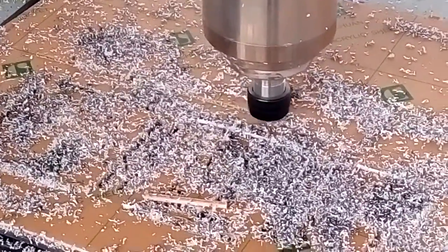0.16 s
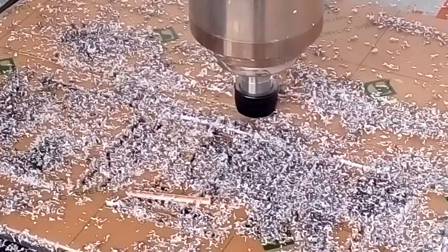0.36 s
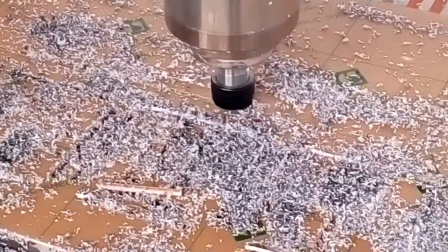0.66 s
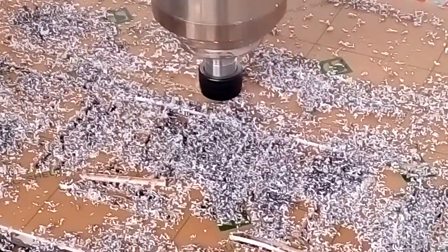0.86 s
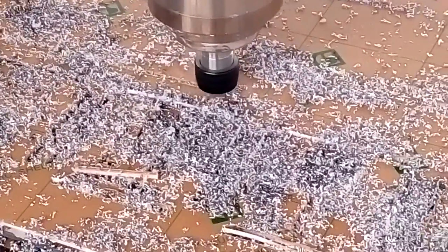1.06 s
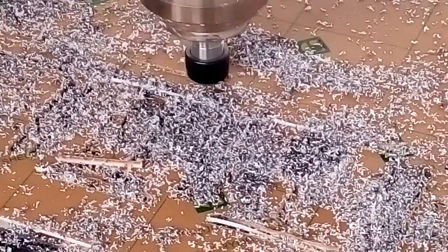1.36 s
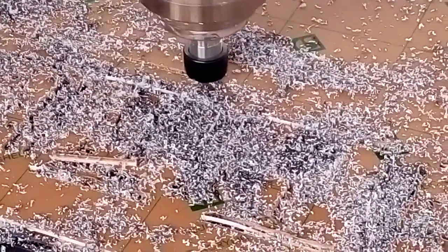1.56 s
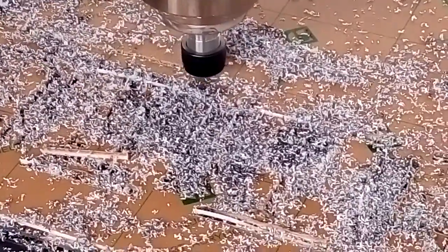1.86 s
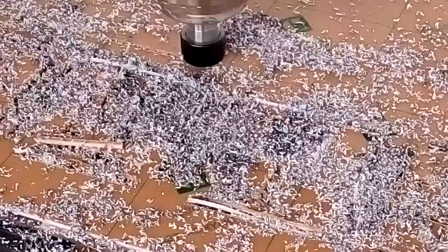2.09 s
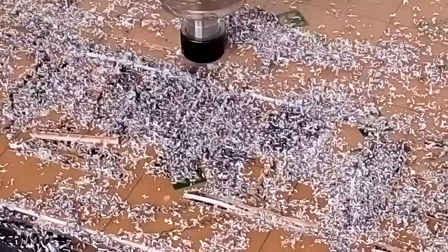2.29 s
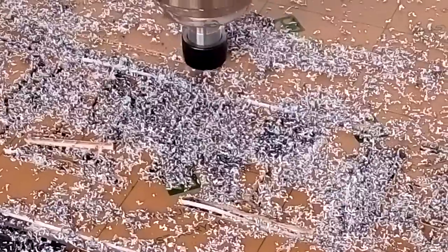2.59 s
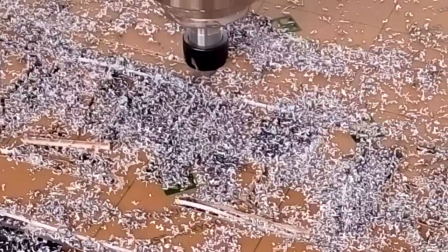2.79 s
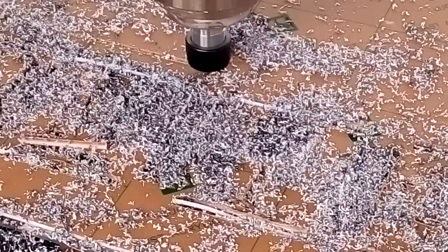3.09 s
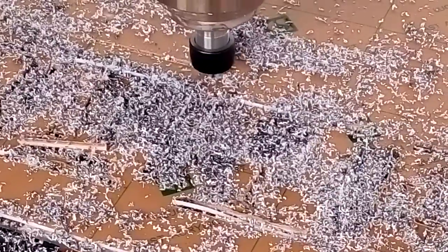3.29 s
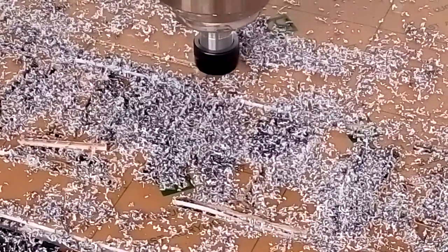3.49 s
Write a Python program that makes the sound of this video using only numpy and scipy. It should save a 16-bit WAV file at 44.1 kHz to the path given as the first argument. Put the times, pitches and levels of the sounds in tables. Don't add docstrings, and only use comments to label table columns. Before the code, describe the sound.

Continuous milling spindle whine, left-heavy and pure with buzzing overtones, over low shop rumble and thin hiss; a short bright air puff passes around two-thirds through, then the same whine continues to the end.

```python
import sys
import numpy as np
from scipy import signal
from scipy.fft import rfft, irfft, next_fast_len
from scipy.io import wavfile
from scipy.ndimage import uniform_filter1d

SR = 44100
rng = np.random.default_rng(int(sys.argv[2]) if len(sys.argv) > 2 else 0)


def inscribe(sig):
    pcm = np.round(np.clip(np.atleast_2d(sig).T, -1, 1) * 32767)
    wavfile.write(sys.argv[1], SR, pcm.astype(np.int16))


def voltage_ratio(decibels):
    exponent = np.asarray(decibels, float) / 20
    return 10 ** exponent


N = 160965
STEP = 32

# pitch_hz, left_db_per_hz, right_db_per_hz, likeness_0_to_1 [between the ears]
HISS_COLOUR = [(30, -79.5, -91.5, .6), (65, -87.5, -88, 0.8), (141, -64.5, -69.5, 1),
               (450, -78.5, -82, 0.99), (754, -63, -80, 0.2), (2390, -72.5, -64.5, 0),
               (2980, -76.5, -78.5, 0.7), (5900, -78, -72.5, 0.02)]
# pitch_hz, left_db, right_db
HISS_ROLL = [(3960, -1.5, -2), (4500, -4, -5), (6500, -1.5, -0.5), (7030, -13.5, -3.5), (7520, -23.5, -12),
             (8550, -27, -24.5), (11000, -34.5, -33.5), (15000, -45, -54)]
# time_s, level_db
CHIP_LOAD = [(0, 0.5), (.7, 1), (1, -0.5), (1.5, -1.5), (2, -1), (2.3, 1.5), (3.2, 0), (3.65, -1.5)]
# time_s, level_db
SHOP_RUMBLE = [(0, -2.5), (.42, 1), (.7, 0.5), (1, 2), (1.5, -5.5), (2.1, 3), (2.45, 1), (2.95, -3),
               (3.4, 2.5), (3.65, 1.5)]
RUMBLE_TOP_HZ = 350
HISS_SWAY_DB, HISS_FLICKER_DB = .7, 1.1

# multiple [eighths of a shaft turn], left_db, right_db
MAINS_LINES = [(1, -60.5, -65), (2, -64, -65.5), (5, -58, -57.5), (6, -56, -61.5), (7, -49.5, -55.5),
               (9, -59, -57.5), (10, -70, -53.5), (11, -57.5, -65), (15, -66, -51), (18, -47.5, -68.5),
               (19, -67.5, -69), (20, -66.5, -78), (21, -71, -57.5), (22, -69, -51), (23, -44.5, -55),
               (26, -53.5, -60.5), (27, -52.5, -58)]
# order [of the shaft], left_db, right_db
DRIVE_LINES = [(8.67, -58.5, -61), (12.49, -60, -43), (13.5, -66, -61.5), (14.49, -47, -67),
               (15.49, -68.5, -56.5), (16.49, -66, -57.5), (17.49, -76, -63), (18.49, -74, -68.5)]

# pitch_hz, width_hz, level_db, peak_s, left_minus_right_db
PUFF_RINGS = [(1890, 7800, -49.5, 3.3, -5), (1690, 1800, -49.5, 3.5, -2), (2300, 740, -36, 2.55, -1),
              (2790, 340, -36, 2.7, -3), (3506, 220, -31.5, 2.69, 1), (3720, 320, -30, 2.893, 1.5),
              (3930, 680, -27.5, 2.76, 1), (4380, 1200, -29.5, 2.694, -4.5), (4970, 300, -34.5, 2.67, -12),
              (5040, 700, -35.5, 2.75, -6), (5620, 170, -33.5, 2.786, -4), (5980, 400, -33.5, 2.66, -7),
              (8500, 710, -56, 2.68, 3), (10800, 1500, -63, 2.66, 2), (13000, 2500, -70.5, 2.64, 1.5)]
PUFF_RISE_S, PUFF_FALL_S, PUFF_GRAIN_DB = .08, .14, 1.5

SHAFT_HZ = 399.25
# order, left_db, right_db, right_lag_rad, drift_db_per_s [as the phone moves]
WANDERING_ORDERS = [(7, -56, -50, 1.1, 2.5), (11, -65, -61.5, 3, -10.5), (12, -61, -72, -0.5, 4.5),
                    (13, -64, -54.5, 10.5, -4), (16, -54.5, -47, 0.5, -4), (17, -67, -46, 1.5, -2.5),
                    (18, -69.5, -51, -0.5, -1), (19, -71.5, -55.5, 3, 0), (20, -78, -61.5, 5.5, 0.5),
                    (21, -87, -63, 6, -1), (22, -66.5, -65.5, -1.6, 0.5), (23, -72, -67, -0.5, -0.5),
                    (24, -73, -72.5, 11, -1.5)]
TOP_DB, TOP_FALL_DB = -73, -1.3
BLUR_ORDER, BLUR_POWER, BLUR_HZ = 10.5, 4.2, 1.8
SWAY_DB, SWAY_RATE_HZ = 2.5, 3.164
# time_s, order_2_left_db, order_2_right_db, order_6_left_db, order_6_right_db
FLUTE_DRIFT = [(0, -13, -31.5, -22.5, -25), (.4, -15, -38, -25, -25), (.7, -15, -39, -25, -24.5),
               (1, -17, -29, -25.5, -27.5), (1.3, -16.5, -29, -27, -28), (1.6, -15.5, -28.5, -28, -29),
               (1.9, -13, -23.5, -27, -30), (2.2, -12, -24.5, -26, -34), (2.5, -12, -26, -27, -29.5),
               (2.8, -12.5, -25, -30, -31.5), (3.1, -12.5, -25.5, -28.5, -26.5),
               (3.65, -12, -22.5, -26, -21.5)]
# time_s, then left_db, right_db for each of orders 1, 3, 4
LOW_DRIFT = [(0, -38, -36.5, -39, -31, -37, -41), (.45, -37, -36.5, -37, -29, -33, -41),
             (.75, -36, -36.5, -35, -28.5, -31, -38), (1, -37, -32, -34, -31.5, -32, -35),
             (1.3, -39, -36, -36, -32, -28.5, -35), (1.65, -40, -38, -37, -33, -30, -33),
             (2, -37, -34.5, -36, -33, -30, -37), (2.5, -40, -34.5, -30, -34, -32, -41),
             (3.101, -42, -38.5, -34, -35, -35, -41), (3.65, -38, -32, -34, -38, -35, -45)]
# time_s, then left_db, right_db for each of orders 5, 8, 9
UPPER_DRIFT = [(0, -47, -33, -50, -54, -47, -45), (.45, -49, -31.5, -48.5, -46, -51.5, -38.5),
               (1, -45, -40, -55, -50, -42, -39), (1.65, -52, -51, -62, -48.5, -52.5, -42),
               (2.1, -46, -44, -63.5, -48.5, -51.5, -40.5), (2.6, -44, -48, -60, -44, -38, -47),
               (3.15, -45, -43, -41, -41, -42, -53), (3.45, -40, -46, -49, -49.5, -38, -54),
               (3.65, -39, -51, -42, -49, -41, -57)]
# time_s, then left_db, right_db for each of orders 10, 14, 15
HIGH_DRIFT = [(0, -50, -38.5, -49, -42, -53, -47), (.45, -51, -39, -49, -46, -57, -50),
              (.75, -46, -43.5, -54, -37, -63, -47), (1.051, -49, -48.5, -51.5, -45, -55, -52.5),
              (1.65, -45, -41, -39, -46, -52, -39), (2, -47, -40.5, -42.5, -51, -51.5, -35.5),
              (2.5, -43, -46, -46, -46.5, -53, -40), (3.1, -40, -40, -51.5, -46, -58.5, -36.5),
              (3.65, -40, -46, -41, -52.5, -57, -41.5)]
# order, right_lag_rad, turned_lag_change_rad, blurred_share, blur_hz
DRIFTING_ORDERS = [(2, -1.4, .65, .008, 10), (6, 2.2, -1.1, .035, 14), (1, -.3, .14, .008, 8),
                   (3, .45, .1, .015, 10), (4, 2.35, -.5, .09, 12), (5, 2.2, -.3, .5, 11),
                   (8, 2, .7, .45, 16), (9, 2.4, .2, .4, 18), (10, 1.5, .8, .5, 18),
                   (14, -1.2, -.5, .8, 25), (15, -1.2, 1.7, .7, 25)]
# time_s, turned_share
PHONE_TURN = [
    (0, 0),
    (2.2, 0),
    (2.8, 1),
    (3.65, .9),
]

# start_s, hash_db
PORT_SLIPS = [
    (0.706, -50),
    (1.965, -48),
]
# pitch_hz, level_db
HASH_COLOUR = [(5000, -11.5), (7500, 1), (9500, -3), (12500, -14.5), (15500, -10.5)]
SLIP_S, FLIP_HZ = .04, 2000


def smooth(slow):
    ramp = slow[:, :-1, None] + np.diff(slow)[:, :, None] * np.arange(STEP) / STEP
    return ramp.reshape(len(slow), -1)[:, :N]


def walk(rate_hz, count=1):
    hold = max(int(SR / STEP / rate_hz), 2)
    draws = rng.standard_normal((count, 400))[:, :N // STEP // hold + 2]
    held = np.repeat(draws, hold, axis=1)
    slewed = uniform_filter1d(uniform_filter1d(held, hold), hold)
    return 1.15 * slewed[:, :N // STEP + 2]


def follow(x, table):
    first, *columns = np.array(table).T
    return [np.interp(x, first, column) for column in columns]


def shaped(gain):
    size = next_fast_len(N)
    hz = np.maximum(np.arange(size // 2 + 1) * SR / size, 1)
    real, imag = rng.standard_normal((2, len(hz)))
    return irfft((real + 1j * imag) * gain(hz) * np.sqrt(size * SR / 4), size)[:N]


def tone(hz, db, lag=0., blur=0., blur_hz=22.0):
    pole = np.exp(-2 * np.pi * blur_hz * STEP / SR)
    flutter = signal.lfilter([1], np.poly([pole, pole]), rng.standard_normal((6, N // STEP + 2)))
    flutter = (flutter[:3] + 1j * flutter[3:]) / flutter.std()
    ear = np.exp(1j * lag * np.array([[1], [0]]))
    steady = np.sqrt(2 - 2 * blur) * ear
    smeared = np.sqrt(blur / 2) * (flutter[:2] + flutter[2] * ear)
    body = smooth(voltage_ratio(db) * (steady + smeared))
    return (body * np.exp(2j * np.pi * (hz * np.arange(N) / SR + rng.random()))).real


def hiss(t):
    colour, roll = np.array(HISS_COLOUR), np.array(HISS_ROLL)
    load_db, = follow(t, CHIP_LOAD)
    rumble_db, = follow(t, SHOP_RUMBLE)
    out = 0
    for centre in 20 * 2 ** np.arange(0, 10, .5):
        def band(hz):
            return np.cos(np.pi * np.clip(np.log2(hz / centre), -.5, .5))
        like = np.clip(np.interp(np.log(centre), np.log(colour[:, 0]), colour[:, 3]), 0, 1)
        mid, side = shaped(band), shaped(band)
        pair = np.sqrt((1 + like) / 2) * mid + np.sqrt((1 - like) / 2) * side * np.array([[1], [-1]])
        swell_db = rumble_db if centre < RUMBLE_TOP_HZ else load_db
        level_db = swell_db + HISS_SWAY_DB * walk(0.69) + HISS_FLICKER_DB * walk(14.0)
        out = out + pair * smooth(voltage_ratio(level_db))
    log_hz = np.log(np.maximum(np.arange(N // 2 + 1) * SR / N, 1))
    ears_db = []
    for ear in (1, 2):
        density_db = np.interp(log_hz, np.log(colour[:, 0]), colour[:, ear])
        ears_db.append(density_db + np.interp(log_hz, np.log(roll[:, 0]), roll[:, ear]))
    return irfft(rfft(out) * voltage_ratio(np.array(ears_db)), N)


def electrics(t):
    out = 0
    for multiple, left, right in MAINS_LINES:
        level_db = np.array([[left], [right]]) + 1.2 * walk(4.6)
        out = out + tone(round(multiple) * SHAFT_HZ / 8, level_db, -1.0, 0.28)
    for order, left, right in DRIVE_LINES:
        passing_db = -2.4 * (t - 1.9) ** 2
        level_db = np.array([[left], [right]]) + 1.3 * walk(5.6) + passing_db
        out = out + tone(order * SHAFT_HZ, level_db, -2., 0.02)
    return out


def puff(t):
    out = 0
    for centre, width, db, peak, pan_db in PUFF_RINGS:
        def ring(hz):
            resonance = 1 / (1 + (2 * (hz - centre) / width) ** 2)
            return resonance * (hz < 2.2 * centre) / np.sqrt(width * np.pi / 4)
        spread = np.where(t < peak, PUFF_RISE_S, PUFF_FALL_S)
        swell = np.exp(-.5 * ((t - peak) / spread) ** 2)
        gain = voltage_ratio(db + pan_db * np.array([[.5], [-.5]]) + PUFF_GRAIN_DB * walk(60.))
        out = out + np.array([shaped(ring), shaped(ring)]) * smooth(swell * gain)
    return out


def shaft_order(order, db, lag):
    blur = 1 - 0.55 * np.exp(-(order / BLUR_ORDER) ** BLUR_POWER)
    return tone(order * SHAFT_HZ, db, lag, blur, order * BLUR_HZ + 4.2)


def spindle(t):
    ears_db = []
    for table in (FLUTE_DRIFT, LOW_DRIFT, UPPER_DRIFT, HIGH_DRIFT):
        ears_db += follow(t, table)
    pairs_db = np.reshape(ears_db, (len(DRIFTING_ORDERS), 2, -1))
    turned, = follow(t, PHONE_TURN)
    out = 0
    for (order, lag, lag_change, blur, blur_hz), level_db in zip(DRIFTING_ORDERS, pairs_db):
        out = out + tone(order * SHAFT_HZ, level_db, lag + lag_change * turned, blur, blur_hz)
    for order, left, right, lag, drift in WANDERING_ORDERS:
        wander_db = drift * (t - t.mean()) + SWAY_DB * walk(SWAY_RATE_HZ, count=2)
        out = out + shaft_order(round(order), np.array([[left], [right]]) + wander_db, lag)
    for order in range(25, 39):
        level_db = TOP_DB + TOP_FALL_DB * (order - 25) + 3 * walk(2, count=2)
        out = out + shaft_order(order, level_db, 1.)
    return out


def scene():
    t = np.arange(N // STEP + 2) * STEP / SR
    return hiss(t) + electrics(t) + puff(t) + spindle(t)


def slipping_port(left):
    t, colour = np.arange(N) / SR, np.array(HASH_COLOUR)
    high = signal.butter(6, FLIP_HZ, "high", fs=SR, output="sos")
    treble = signal.sosfiltfilt(high, left)

    def bright(hz):
        return voltage_ratio(np.interp(np.log(hz), np.log(colour[:, 0]), colour[:, 1]) - 31.5)
    port_hash = shaped(bright)
    out = left
    for start, db in PORT_SLIPS:
        gate = np.clip(np.minimum(t - start, start + SLIP_S - t) / .002, 0, 1)
        out = out + gate * (voltage_ratio(db) * port_hash - 2 * treble)
    return out


def low_pass(x):
    return signal.sosfilt(signal.butter(12, 15480, fs=SR, output="sos"), x)


def record(dry):
    mix = np.array([slipping_port(dry[0]), dry[1]])
    return low_pass(mix)


dry = scene()
out = record(dry)
inscribe(out)
```